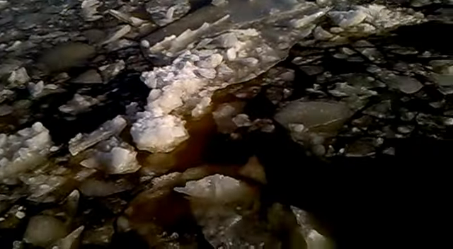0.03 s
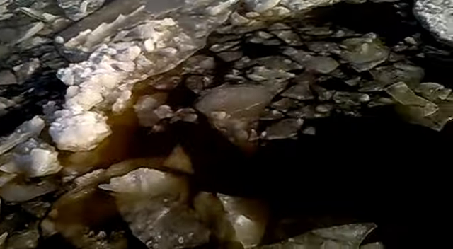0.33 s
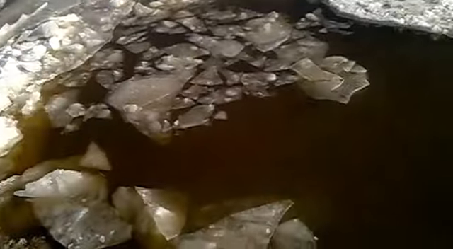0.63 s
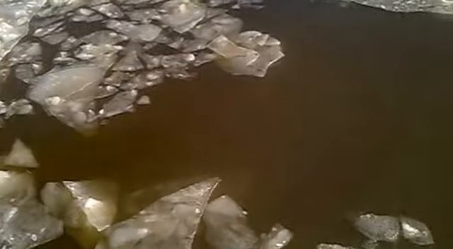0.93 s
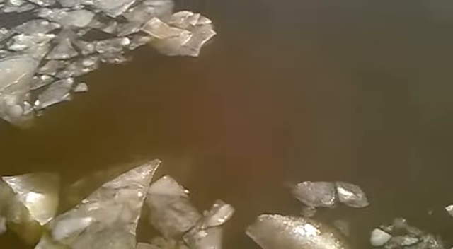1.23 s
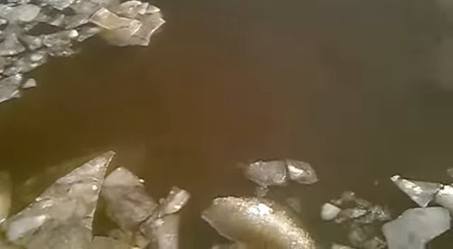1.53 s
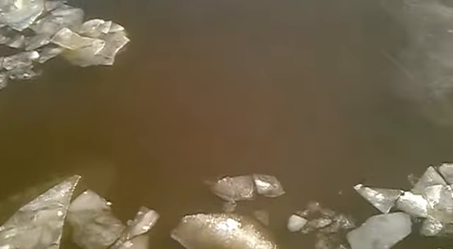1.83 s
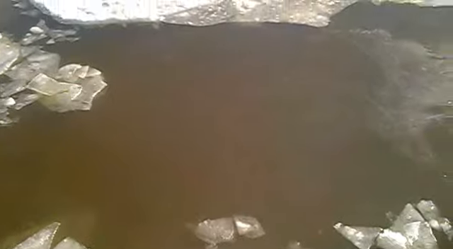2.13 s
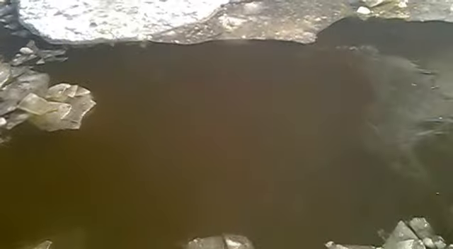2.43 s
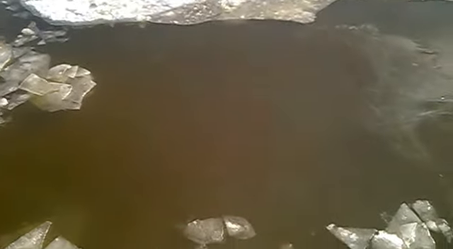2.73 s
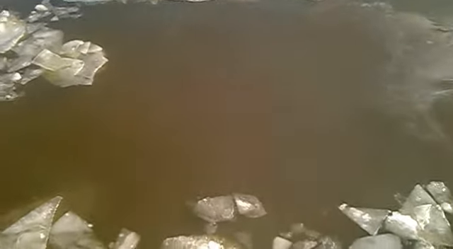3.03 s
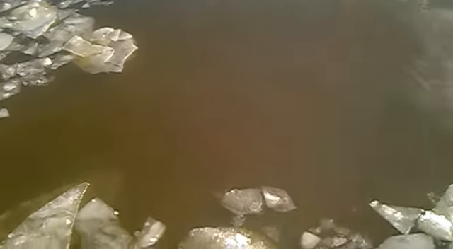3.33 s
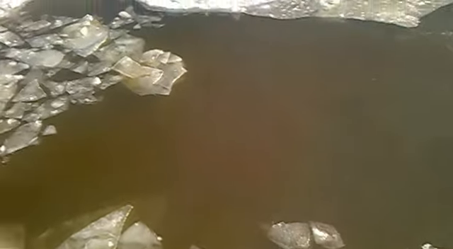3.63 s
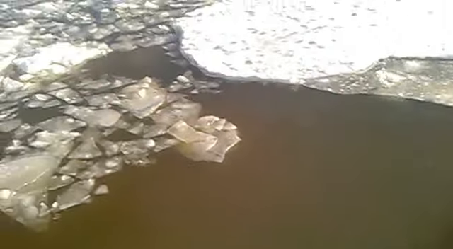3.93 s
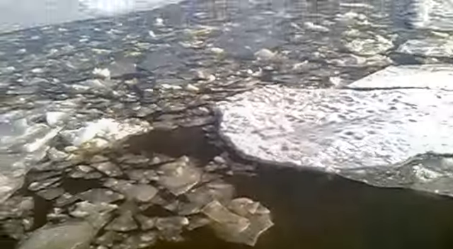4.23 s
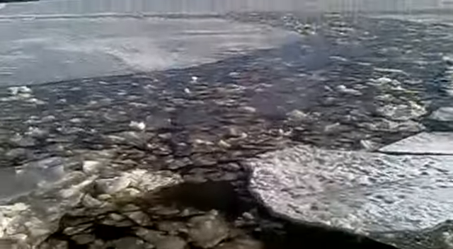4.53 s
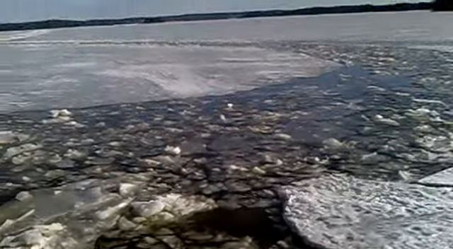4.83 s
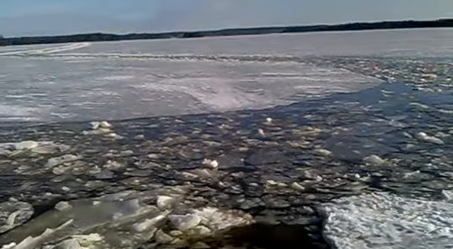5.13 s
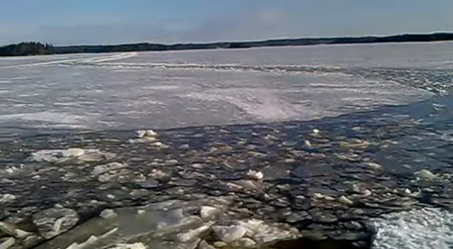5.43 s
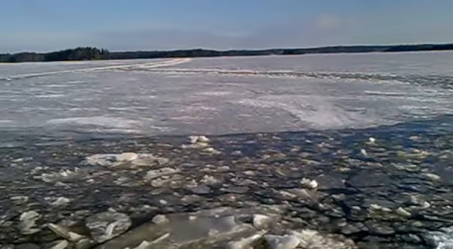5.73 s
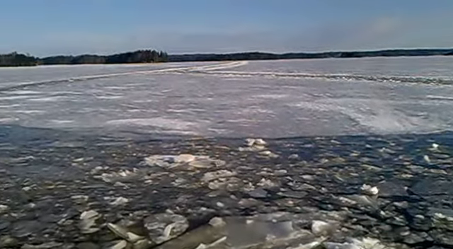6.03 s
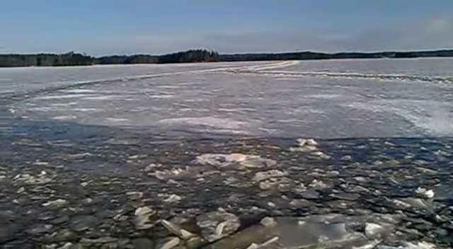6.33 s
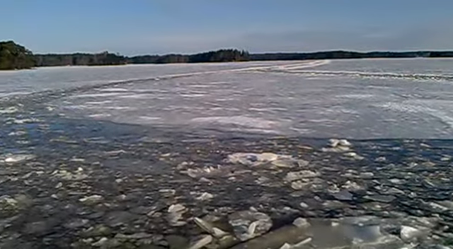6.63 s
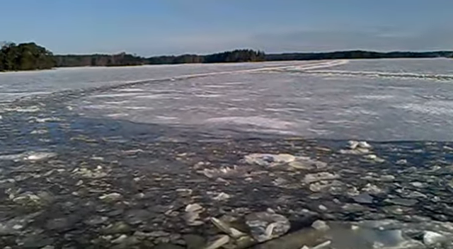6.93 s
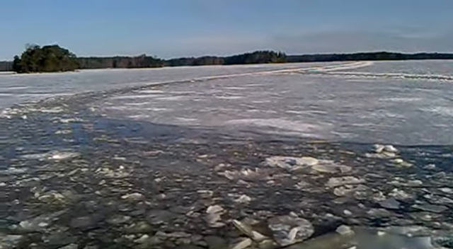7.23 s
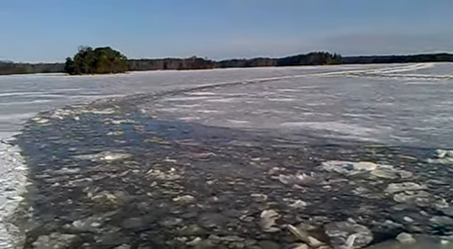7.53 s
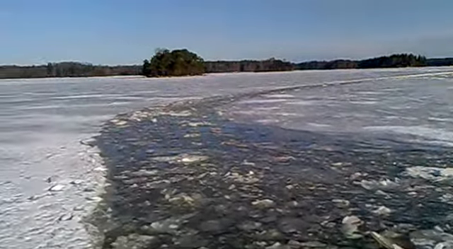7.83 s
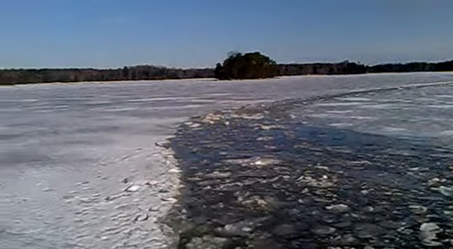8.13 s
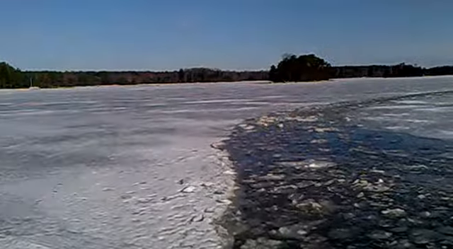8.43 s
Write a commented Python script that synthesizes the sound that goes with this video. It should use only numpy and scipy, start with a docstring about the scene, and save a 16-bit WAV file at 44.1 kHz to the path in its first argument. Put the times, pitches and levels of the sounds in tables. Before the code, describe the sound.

Low wind rumbles on the microphone throughout, out on an icy lake with no echo, over a distant engine's faint drone and a slight hiss. Thin ice ticks quietly in the first half second. A short gust comes at 1 second, then a watery plop at 1.3 and a hollow knock of ice floes at 1.4. Slush washes and laps faintly with tiny plops, swelling around 2 to 2.5 seconds, with a sharp ice snap at 2.3. It swells again with a soft fizz from 4.2 to 4.8, ending in three small snaps. Dull floe knocks recur irregularly, roughly every half second, from 3.2 onward. Between 6.7 and 7.9 seconds, stronger gusts thud on the microphone, the loudest sound, peaking at 7.2. The firmest knock lands at 8.3, and a far bird gives one barely audible, thin peep at 8.6.

```python
"""Broken ice on a lake

Ice drifts in a channel through a frozen lake. Slush washes by in soft, crackling swells, floes
(floating slabs of ice) knock hollowly, thin ice snaps and air trapped in the water plops.
Wind rumbles on the microphone, with a run of stronger gusts, over the low drone of a far
engine. A small bird peeps once."""
import sys
import numpy as np
from scipy import signal
from scipy.fft import rfft, irfft, next_fast_len
from scipy.io import wavfile
from scipy.ndimage import uniform_filter1d, map_coordinates

SR = 44100
rng = np.random.default_rng(int(sys.argv[2]) if len(sys.argv) > 2 else 0)


def transcribe(u):
    """Save the signal u as a 16-bit wav file named by the first command-line argument.

    u: samples, shape (n,) or (channels, n), limited to [-1, 1]; the rate is SR.
    q: integer samples, one column per channel.
    """
    v = np.clip(np.atleast_2d(u).T, -1, 1)
    q = np.round(v * 32767).astype(np.int16)
    wavfile.write(sys.argv[1], SR, q)


N = 383669
TOP_HZ = 15700  # the microphone passes nothing higher

# the engine's low tones: f/Hz, level/dB
ENGINE_TONES = [(49.3, -55.5), (100, -68.5), (150.5, -71), (168, -70.5)]
# the light breeze and its lulls: t/s, level/dB
BREEZE_LEVELS = [(0, -43.5), (.12, -51), (.18, -57), (.42, -58.5), (.54, -45), (.7, -56), (.85, -46.5),
                 (1.6, -50.5), (2.4, -49), (2.88, -53.5), (3.12, -47), (3.5, -50), (4.9, -49.5),
                 (6.05, -49), (6.3, -50.5), (7.5, -44.5), (8.15, -51), (8.7, -46.5)]
# gusts on top of the breeze: peak t/s, level/dB, half-length/s
GUST_PEAKS = [(1.018, -36.5, 0.042), (1.162, -39, 0.03), (4.663, -44.5, 0.041), (5.859, -42.5, .035),
              (6.686, -42, 0.057), (6.823, -34.5, 0.046), (7.057, -33, 0.098), (7.24, -25, 0.049),
              (7.362, -36, .06), (7.501, -31.5, 0.065), (7.707, -30, 0.032), (7.86, -38, 0.064),
              (8.416, -39, 0.038), (8.611, -43.5, 0.047)]
# single swirls of air that thump the microphone: t/s, peak level/dB, f/Hz
AIR_THUMPS = [(7.035, -38.5, 175), (7.704, -34.5, 168)]
# swells that lift the slush: crest t/s, rise/s, fall/s, wash/dB, fizz/dB, lapping/dB
WATER_SWELLS = [(.22, .25, 0.3, -75.5, -85, -77.5), (.46, 0.3, 0.44, -74.5, -86, -78),
                (1.02, 0.061, .1, -80, -89, -89), (1.38, 0.22, 0.16, -77, -83, -78),
                (1.96, 0.22, 0.18, -70, -79, -84), (2.27, 0.22, 0.21, -68.5, -73, -69.5),
                (2.6, 0.12, 0.13, -91.5, -95, -75.5), (3.38, 0.24, 0.18, -84, -78.5, -83.5),
                (4.31, 0.22, 0.23, -67.5, -68.5, -77), (4.44, 0.027, 0.068, -68, -67, -78),
                (4.66, 0.15, 0.12, -66.5, -63.7, -96), (4.78, 0.017, 0.05, -71, -71, -94),
                (4.98, 0.046, 0.12, -79.5, -82, -97), (5.38, 0.088, 0.13, -73.5, -82, -75.5),
                (5.65, 0.057, 0.27, -80, -87.5, -81.5), (6.28, 0.13, .08, -83.5, -93, -92),
                (6.6, 0.1, 0.09, -88, -95, -80.5)]
# thin ice breaking: t/s, peak level/dB
ICE_SNAPS = [(0.107, -61.5), (0.163, -65), (0.263, -63), (0.435, -67), (2.321, -44), (2.331, -72),
             (4.645, -56), (4.676, -50), (4.776, -57), (7.218, -73)]
# air pockets ringing in the water: t/s, f/Hz, peak level/dB, time to fade by 60 dB/s
AIR_POCKETS = [(0.433, 1320, -59.5, .025), (1.030, 421, -59, .07), (1.2625, 433, -44, 0.054),
               (1.2628, 545, -50.5, 0.048), (1.2632, 713, -60, 0.064), (1.2624, 1230, -76, 0.035),
               (2.026, 1320, -68, 0.026), (2.405, 1270, -60, 0.096), (2.572, 630, -67.5, 0.025),
               (2.675, 1220, -72, .04), (3.360, 745, -64.5, 0.023), (3.575, 1430, -71, 0.026),
               (5.862, 1370, -58, 0.047), (7.920, 1220, -67, .035)]
# the tones a struck floe rings with: f/Hz, width/Hz, level/dB
FLOE_TONES = [(239, 96, 7.5), (338, 69, 7.5), (710, 200, 14), (1065, 170, -5.5), (1530, 360, -4),
              (3380, 600, -14), (5450, 1400, -14)]
# floes bumping: t/s, peak level/dB, treble cut-off f/Hz, boost of the low tones/dB
FLOE_KNOCKS = [(1.4320, -50, 1500, 10.5), (2.271, -55, 970, 6), (3.2083, -48, 1230, 10),
               (3.7500, -53.5, 1430, 8), (3.995, -48, 1510, 8.5), (4.834, -61, 1480, 12),
               (5.1473, -53, 940, 9), (5.538, -49.5, 1520, 6.5), (5.8538, -49, 1600, 6),
               (6.020, -65, 1400, 4), (6.881, -45.5, 1500, 7), (7.4079, -47.5, 1400, 8),
               (8.323, -34.5, 1610, 0.5)]

# Each spectrum says how strong a noise is from bass to treble: f/Hz, relative level/dB
BREEZE_SPECTRUM = [(12, -13.5), (25, 1.5), (45, 2), (70, -0.5), (110, -8.5), (165, -16), (205, -21),
                   (280, -29), (450, -39.5), (800, -48), (1500, -70), (4000, -100)]  # light wind on the microphone
GUST_SPECTRUM = [(12, -22), (25, -7.5), (45, 1.5), (70, -1), (115, -10), (170, -19), (220, -33.5),
                 (300, -42.5), (450, -47.5), (750, -53.5), (1200, -76.5), (3000, -100)]  # strong wind on the microphone
LAP_SPECTRUM = [(100, -10), (300, 12.5), (500, -1), (800, 0), (1300, 2), (2200, -9.5), (3500, -30),
                (8000, -35)]  # ripples against the ice
RUB_SPECTRUM = [(500, -50), (880, -19), (1000, 8), (1120, -9), (1800, -50)]  # two floes sliding
WASH_SPECTRUM = [(300, -41), (750, -5.5), (980, -7.5), (1250, -10), (1700, 0.5), (2300, -1), (3200, -3.5),
                 (5000, -3), (6200, -5), (8000, -5), (10000, -6), (13500, -6.5), (16000, -17.5)]  # the soft hiss of slush
FIZZ_SPECTRUM = [(1000, -31), (1600, -8), (2200, 5), (3100, -3.5), (4500, -8.5), (7500, -4.5), (9000, -3),
                 (9700, 2), (11800, 1), (13000, -6), (16000, -14)]  # the sharper rasp of slush
SNAP_SPECTRUM = [(500, -38), (1400, -4), (2200, 9), (3800, -4), (5500, -14), (9000, -42), (16000, -20)]  # thin ice breaking
HISS_SPECTRUM = [(100, -0.8), (1000, -0.7), (3000, -3.5), (6000, 0.45), (9000, 1), (12000, 2), (14500, 5),
                 (16000, 0)]  # the microphone's own hiss


def amp(db):
    """Turn decibels into a factor to multiply a sound by."""
    return 10 ** (np.asarray(db) / 20)


def unit(x):
    """Scale a signal to an average (rms) size of 1."""
    return x / np.sqrt(np.mean(x ** 2) + 1e-20)


def together_db(gains):
    """Level of unrelated sounds heard together: their powers add."""
    return 10 * np.log10(sum(g ** 2 for g in gains))


def wobble(rate):
    """A smooth curve through `rate` random values a second."""
    return map_coordinates(rng.standard_normal(int(N * rate / SR) + 4), [np.arange(N) * rate / SR])


def hump(s, rise_s, fall_s, shape=2):
    """A curve that rises to 1 at time s and falls again; shape 1 is pointed, 2 is a bell."""
    t = np.arange(N) / SR - s
    return np.exp(-np.abs(t / np.where(t < 0, rise_s, fall_s)) ** shape)


def swelling(levels_db, calm_db):
    """Level of one layer over time, in dB: each swell rises out of the calm and sinks back."""
    swells = [amp(db) * hump(s, rise, fall, shape=1.02)
              for (s, rise, fall, *_), db in zip(WATER_SWELLS, levels_db)]
    return together_db([amp(calm_db)] + swells)


def filtered(x, response):
    """Multiply each frequency f in x by response(f), which can scale it and delay it."""
    size = next_fast_len(len(x) + 8192)
    return irfft(rfft(x, size) * response(np.fft.rfftfreq(size, 1 / SR)), size)[:len(x)]


def coloured(x, spectrum):
    """Shape the bass and treble of x with a spectrum table."""
    hz, db = np.transpose(spectrum)
    return filtered(x, lambda f: amp(np.interp(np.log(f + 1), np.log(hz), db)))


def rush(spectrum, patchy_db):
    """Rushing noise with louder and softer patches scattered over time and frequency."""
    cells = signal.stft(rng.standard_normal(N), nperseg=512)[2]
    patches = uniform_filter1d(rng.standard_normal(cells.shape), size=5, axis=0)  # smooth in frequency
    patches = uniform_filter1d(patches, size=7, axis=1)  # smooth in time
    noise = signal.istft(cells * amp(patchy_db * unit(patches)))[1][:N]
    return unit(coloured(noise, spectrum))


def grains(per_s, pitch_hz, spread, cycles, scatter_db=5.5):
    """Tiny fading pings at random times and pitches, a few much louder than the rest."""
    count = int(per_s * N / SR)
    t = np.arange(SR // 50) / SR
    start = rng.integers(0, N, (count, 1))
    hz = np.minimum(pitch_hz * np.exp(spread * rng.standard_normal((count, 1))), TOP_HZ)
    size = amp(scatter_db * np.minimum(rng.exponential(size=(count, 1)), 4))
    pings = size * np.sin(2 * np.pi * hz * t) * np.exp(-hz * t / cycles)
    positions = start + np.arange(len(t))
    return unit(np.bincount(positions.ravel(), pings.ravel(), N)[:N])


def add(track, s, sound, peak_db):
    """Mix a sound into the track at time s with the given peak level."""
    part = track[round(s * SR):][:len(sound)]
    part += amp(peak_db) * sound[:len(part)] / np.abs(sound).max()


def engine():
    """A far engine drones: a few low tones that waver in loudness and a little in pitch."""
    t = np.arange(N) / SR
    tones = [amp(db + 3.1 * wobble(3.8)) * np.sin(2 * np.pi * hz * t + 0.83 * wobble(3))
             for hz, db in ENGINE_TONES]
    return np.sqrt(2) * sum(tones)


def wind(gusty_above_db=-42, blend_db=3, flutter_db=1.63):
    """Swirling air beats on the microphone; strong gusts make a deeper, rounder thudding."""
    t = np.arange(N) / SR
    breeze = amp(np.interp(t, *np.transpose(BREEZE_LEVELS)))
    gusts = [amp(db) * hump(s, half, half) for s, db, half in GUST_PEAKS]
    level_db = together_db([breeze] + gusts)
    gusty = 0.5 + 0.5 * np.tanh((level_db - gusty_above_db) / blend_db)  # 0 = breeze, 1 = gust
    light = np.sqrt(1 - gusty) * rush(BREEZE_SPECTRUM, patchy_db=2)
    strong = np.sqrt(gusty) * rush(GUST_SPECTRUM, patchy_db=2.5)
    track = amp(level_db + flutter_db * wobble(16)) * (light + strong)
    age = t[:SR // 10]
    for s, db, hz in AIR_THUMPS:
        thump = np.sin(2 * np.pi * hz * age) * age * np.exp(-hz * age / 0.58)
        add(track, s, thump, db)
    return track


def bird(s=8.595, length_s=0.063, pitch_hz=7000, arch_hz=170, peak_db=-74):
    """A far bird gives one thin peep that rises and falls a little in pitch."""
    track = np.zeros(N)
    arch = np.sin(np.linspace(0, np.pi, int(length_s * SR)))
    hz = pitch_hz + arch_hz * arch + 40 * wobble(340)[:len(arch)]
    add(track, s, arch * np.sin(2 * np.pi * np.cumsum(hz) / SR), peak_db)
    return track


def floe_rub(s=4.2, level_db=-77):
    """Two floes slide along each other with a faint rasp, close to a single pitch."""
    return amp(level_db) * hump(s, rise_s=0.065, fall_s=0.25) * rush(RUB_SPECTRUM, patchy_db=6)


def ripples():
    """Ripples lap at the ice with a soft, uneven patter that grows with the swells."""
    *_, lap_db = np.transpose(WATER_SWELLS)
    patter = grains(per_s=220, pitch_hz=1215, spread=0.5, cycles=1.4)
    lapping = rush(LAP_SPECTRUM, patchy_db=4.5) + amp(-4.5) * patter
    return amp(swelling(lap_db, calm_db=-87.5)) * lapping


def slush():
    """Ice crystals rub as the water lifts them: a crackling wash, with a fizz in the larger swells."""
    *_, wash_db, fizz_db, _ = np.transpose(WATER_SWELLS)
    pings = grains(per_s=1000, pitch_hz=3900, spread=0.6, cycles=1.7)
    crackle = unit(coloured(pings, WASH_SPECTRUM))
    wash_gain = amp(swelling(wash_db, calm_db=-87.5) + 2.08 * wobble(45))
    wash = wash_gain * (rush(WASH_SPECTRUM, patchy_db=0) + amp(-7) * crackle)
    fizz_gain = amp(swelling(fizz_db, calm_db=-100) + 0.8 * wobble(40))
    fizz = fizz_gain * rush(FIZZ_SPECTRUM, patchy_db=2.5)
    return amp(0.3 * wobble(9.2)) * (wash + fizz)


def snaps(fade_s=0.036):
    """Thin plates of ice break with a dry tick, a burst of noise that dies quickly."""
    track, t = np.zeros(N), np.arange(SR // 20) / SR
    for s, db in ICE_SNAPS:
        burst = rng.standard_normal(len(t)) * amp(-60 * t / fade_s)
        add(track, s, coloured(burst, SNAP_SPECTRUM), db)
    return track


def plops(attack_s=0.0013):
    """Trapped air rings with a soft start and a slightly rising pitch, roughened by the splash."""
    track, t = np.zeros(N), np.arange(SR // 8) / SR
    soft_start = 1 - np.exp(-t / attack_s)
    for s, hz, db, fade_s in AIR_POCKETS:
        splash = np.interp(t * hz / 2, np.arange(200), rng.standard_normal(200))
        phase = 2 * np.pi * hz * (t + 0.3 * t ** 2) + splash
        add(track, s, np.sin(phase) * amp(-60 * t / fade_s) * soft_start, db)
    return track


def floe_response(f, boost_db, boost_below_hz=500, delay_s=0.00264, delay_at_hz=1000):
    """A floe rings at a few tones; its bending waves carry the treble ahead of the bass."""
    tones = sum(amp(db + boost_db * (hz < boost_below_hz))
                * 1j * f * width / (hz * hz - f * f + 1j * f * width)
                for hz, width, db in FLOE_TONES)
    travel = np.exp(-4j * np.pi * delay_s * np.sqrt(delay_at_hz * f))
    return tones * travel


def knocks(tick_hz=(3000, 5970), tick_db=-22, jostle_db=-35, jostle_fade_s=0.055):
    """Floes bump: water stops their ringing at once, and the soft contact dulls all but a faint tick."""
    track, t = np.zeros(N), np.arange(SR // 10) / SR
    blow = signal.unit_impulse(len(t))
    tick_band = signal.butter(3, tick_hz, 'bandpass', fs=SR, output='sos')
    for s, db, cutoff_hz, boost_db in FLOE_KNOCKS:
        ring = filtered(blow, lambda f: floe_response(f, boost_db))
        # loose pieces around the floe jostle briefly after the blow
        jostle = rng.standard_normal(len(t)) * amp(jostle_db - 60 * t / jostle_fade_s)
        knock = signal.fftconvolve(ring, blow + jostle)[:len(t)]
        soft_contact = signal.butter(7, cutoff_hz, fs=SR, output='sos')
        thud = signal.sosfilt(soft_contact, knock)
        tick = amp(tick_db) * signal.sosfilt(tick_band, knock)
        add(track, s, thud + tick, db)
    return track


def scene():
    """All the sounds meet in the open air over the lake: no echo, one channel."""
    mix = wind() + engine() + slush() + ripples() + floe_rub() + knocks() + plops() + snaps() + bird()
    return mix[None]


def record(dry):
    """The microphone adds its own steady hiss and cuts off the very highest treble."""
    hiss = amp(-76) * unit(coloured(rng.standard_normal(N), HISS_SPECTRUM))
    return filtered(dry[0] + hiss, lambda f: f < TOP_HZ)[None]


dry = scene()
out = record(dry)
transcribe(out)
```